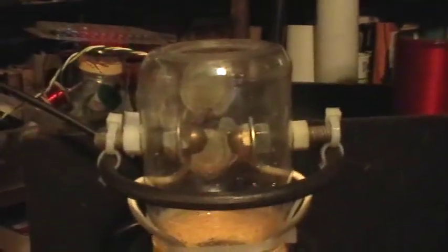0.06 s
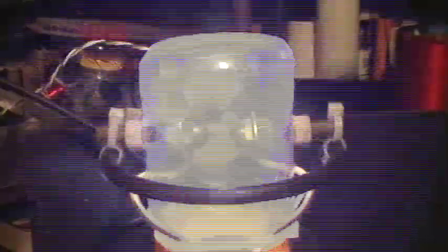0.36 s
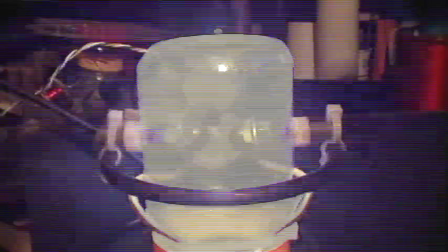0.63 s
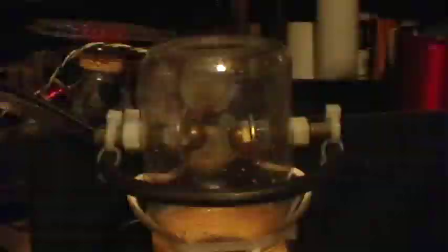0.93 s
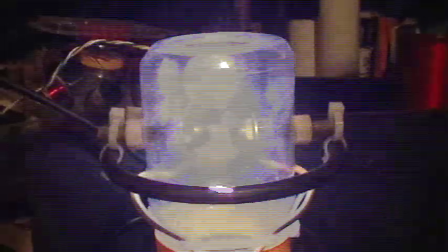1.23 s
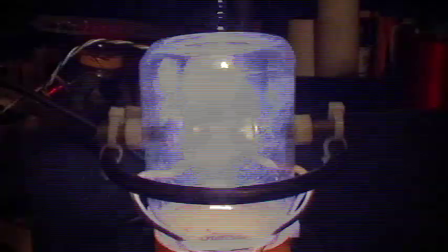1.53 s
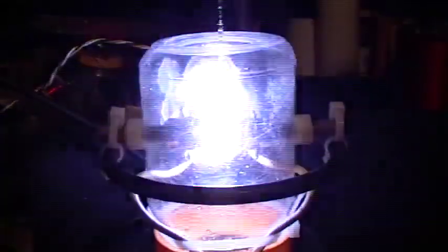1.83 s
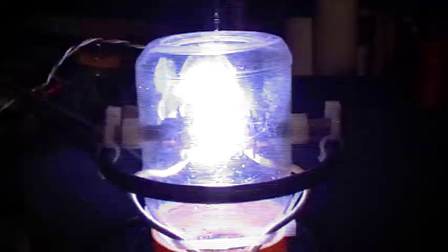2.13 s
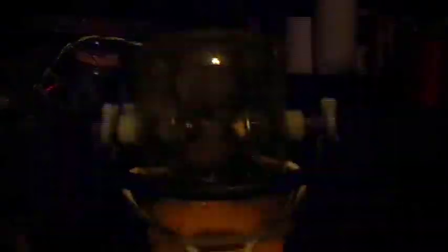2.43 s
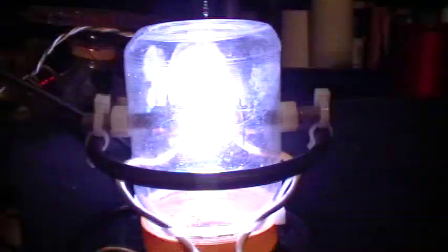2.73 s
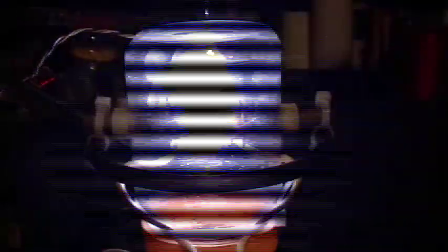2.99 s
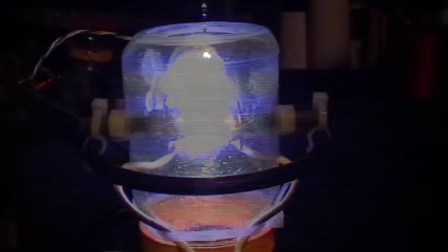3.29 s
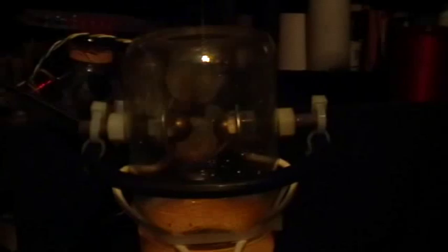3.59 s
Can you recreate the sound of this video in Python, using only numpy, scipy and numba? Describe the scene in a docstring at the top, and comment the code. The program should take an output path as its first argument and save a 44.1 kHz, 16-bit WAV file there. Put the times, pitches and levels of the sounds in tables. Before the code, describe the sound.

A high-voltage spark gap fires sharp, separate snaps that quicken into an irregular crackle, ringing briefly in a glass jar in a small room. Each snap thumps the close microphone. One faint tick comes after the last spark.

```python
"""Sparks in a glass jar

A high-voltage spark gap fires in an upturned jar in a small workshop: single snaps, then a fast,
uneven crackle. Each spark is a sharp pressure pulse that rings the air in the jar and the glass,
then dies away in the room. Soft pops, a few knocks and a last faint tick are heard too. The snaps
overload the close microphone, which adds a low thump to each, and the recorder turns itself down."""
import sys
import numpy as np
from scipy import signal
from scipy.fft import rfft, irfft
from scipy.io import wavfile
from scipy.ndimage import uniform_filter1d
from numba import njit

SR = 44100
rng = np.random.default_rng(int(sys.argv[2]) if len(sys.argv) > 2 else 0)


def persist_wave(psi):
    """Save psi, clipped to +-1, as 16-bit WAV."""
    counts = np.round(np.clip(psi, -1, 1) * 32767).astype(np.int16)
    wavfile.write(sys.argv[1], SR, np.atleast_2d(counts).T)


N = 165375
TAPS = 8192  # samples in one short sound
HZ = np.fft.rfftfreq(TAPS, 1 / SR)  # the frequencies in that sound
AGE = np.arange(TAPS) / SR  # seconds since it began
HOLLOW_T60_S = 0.021  # for knocks and pops; a t60 is the time to fade by 60 dB

# The sparks that jump the gap. Each row: start in seconds, relative strength in dB.
SPARKS = [(0.145, -6), (0.1488, 0.5), (0.1511, -1.5), (0.225, 4), (0.3078, 4), (0.3674, 3.1), (0.4283, 3.5),
          (0.4692, 3.5), (0.5376, 3.6), (0.5806, 3.3), (0.6457, 7.5), (0.6521, -2), (0.685, 1.6),
          (0.7549, 2.5), (0.7964, 0.5), (0.7998, -3), (0.8538, 3), (0.8625, -1.5), (0.8972, 1), (0.9629, 2),
          (1.0045, 0), (1.0486, 1.5), (1.0837, -0.5), (1.1399, 1.5), (1.166, 0.5), (1.2, -1.5),
          (1.2373, 0.2), (1.272, 1.5), (1.3075, 0), (1.3337, 1), (1.3387, -6.5), (1.3585, -0.8),
          (1.3823, -1), (1.4054, -1.5), (1.4219, -0.5), (1.449, 0.5), (1.486, 0.2), (1.5199, 0.5),
          (1.5396, 0.5), (1.5467, -1.5), (1.5643, -1), (1.586, 0.2), (1.6077, 2.3), (1.618, -1),
          (1.6353, -1), (1.6647, 0.5), (1.6767, 0.5), (1.6963, -0.5), (1.7139, 0), (1.723, -2),
          (1.7358, 1.5), (1.7565, -0.5), (1.7709, 1), (1.7838, 1), (1.7985, -1), (1.8165, -1), (1.824, 1),
          (1.836, 0.3), (1.849, -1.5), (1.866, 0), (1.8727, 0), (1.8818, -4), (1.897, 0), (1.909, 0.5),
          (1.9253, -1), (1.9491, 0), (1.9592, -1.5), (1.9697, -2), (1.992, 1), (2.008, -2.5),
          (2.0386, -0.2), (2.0628, -0.5), (2.0682, -2), (2.0935, 0.5), (2.1124, 3.5), (2.132, -1),
          (2.138, 2), (2.15, -3), (2.1608, -0.5), (2.201, 0), (2.2194, 0), (2.2364, -1.5), (2.2536, 1),
          (2.2622, -3.5), (2.2823, -0.5), (2.3266, 1.7), (2.3494, -1.3), (2.4116, 1.5), (2.4627, 0.5),
          (2.5283, 1), (2.5586, 1.5), (2.5764, -1.3), (2.6518, 4), (2.69, 0), (2.707, 0.5), (2.729, 0),
          (2.7529, 1.5), (2.7763, -1), (2.796, -0.5), (2.813, 0.5), (2.8265, 0), (2.8395, 1),
          (2.8675, -1.5), (2.8745, -1.5), (2.89, 0.5), (2.898, -2), (2.921, -0.5), (2.9713, 2.5),
          (2.9885, -0.5), (3.0215, 0.5), (3.0287, -1), (3.0394, 0.5), (3.0459, -1.5), (3.071, -0.5),
          (3.0895, 0.8), (3.099, -1.5), (3.119, -1), (3.1351, 0), (3.1624, -0.2), (3.1789, 2),
          (3.195, -1.5), (3.2213, 3.5), (3.23, -5.5), (3.2683, 0.5), (3.2864, -1.7), (3.3162, 0),
          (3.353, 0), (3.3789, 0.6), (3.4124, 1), (3.4384, -0.5), (3.46, 0.4)]


def amp(db):
    """Turns decibels into a number to multiply by."""
    return 10 ** (np.asarray(db) / 20)


def curve(points, hz):
    """Joins a table's frequency and dB points into a curve, on a scale of octaves."""
    point_hz, db = np.transpose(points)
    return np.interp(np.log(hz + 1), np.log(point_hz + 1), db)


def add(mix, start_s, sound):
    """Mixes a sound in at its start time."""
    part = mix[..., round(start_s * SR):][..., :sound.shape[-1]]
    part += sound[..., :part.shape[-1]]


def causal(db):
    """Makes a filter with these levels that rings only after a sound arrives, never before."""
    log_gain = np.log(amp(np.concatenate([db, db[..., -2:0:-1]], -1)))
    return np.exp(np.conj(signal.hilbert(log_gain)))[..., :len(HZ)]


def coloured(x, points):
    """Gives each row of sound the tone that a table of frequencies and levels describes."""
    taps = irfft(causal(curve(points, HZ)))[:TAPS // 4]
    return signal.oaconvolve(x, taps[None], axes=1)[:, :x.shape[1]]


def ring(tones):
    """Adds up fading pure tones, each with a pitch in Hz, a level in dB and a t60 in seconds."""
    return sum(amp(db - 60 * AGE / t60) * np.sin(2 * np.pi * hz * AGE) for hz, db, t60 in tones)


def workshop():
    """Dull room noise that slowly sinks and dips briefly near the end."""
    # The tone of the noise. Each row: frequency in Hz, relative level in dB.
    tone = [(30, -14), (100, -14.5), (250, 1), (500, -11.5), (800, -6.5), (1600, -19), (2300, -13.5),
            (4000, -23.5), (16000, -43)]
    # Its loudness over time. Each row: time in seconds, level in dB.
    loudness = [(0, -46), (.13, -40), (.3, -46.5), (3.5, -53.5), (3.628, -61), (3.682, -53), (3.75, -49.5)]
    hz = np.fft.rfftfreq(N, 1 / SR)
    # Both ears share "mid"; "side" is what sets left and right apart.
    mid, side = irfft(rfft(rng.standard_normal((2, N))) * amp(curve(tone, hz)), N)
    noise = np.array([mid + 0.18 * side, mid - 0.18 * side]) / mid.std()
    return noise * amp(np.interp(np.arange(N) / SR, *np.transpose(loudness)))


def metal_tick():
    """One faint metallic tick after the last spark: a puff of noise and a thin ring."""
    # The tick's ring. Each row: pitch in Hz, level in dB, t60 in seconds.
    tones = [(1464, -49, 0.78), (4250, -43, 0.045)]
    noise = uniform_filter1d(rng.standard_normal(TAPS), size=3)
    fade = amp(-39.5 - 60 * AGE / 0.071)
    out = np.zeros(N)
    add(out, start_s=3.655, sound=ring(tones) + fade * noise)
    return out


def knocks():
    """Short hollow knocks come with a few of the sparks, a little to the right."""
    # Each row: start in seconds, level in dB, pitch in Hz, overtone level in dB relative to the knock.
    hits = [(0.1475, 1.5, 393, -4), (0.2252, -1.5, 474, 1), (0.3083, -9, 370, -11), (0.3689, -4, 430, 0),
            (0.582, -8, 201, -11), (0.687, 1, 315, -18), (1.142, 0, 262, -10), (1.274, -10.5, 490, 2),
            (1.336, 2, 225, -16), (1.546, 2.5, 165, -12), (1.617, -6.5, 434, -8), (2.921, -8, 337, -11),
            (3.099, -4, 407, -0.5)]
    out = np.zeros(N)
    for start_s, db, hz, overtone_db in hits:
        add(out, start_s, ring([(hz, db, HOLLOW_T60_S), (hz * 1.7, db + overtone_db, HOLLOW_T60_S)]))
    bass_cut = signal.butter(2, 196, "high", fs=SR)
    left_right_db = [-5.5, -0.5]
    return signal.lfilter(*bass_cut, out) * amp(left_right_db)[:, None]


def pops():
    """Every spark gives a soft hollow pop: two tones, each at a random pitch and left-right position."""
    low_hz, high_hz, pop_db = 140, 959, -14.5
    out = np.zeros((2, N))
    for (start_s, db), pair in zip(SPARKS, rng.random((len(SPARKS), 2, 2))):
        for height, left in pair:
            hz = low_hz * (high_hz / low_hz) ** height
            tone = ring([(hz, pop_db + db, HOLLOW_T60_S)])
            add(out, start_s, np.outer([left, 1 - left], tone))
    bass_cut = signal.butter(2, low_hz, "high", fs=SR)
    return signal.lfilter(*bass_cut, out)


def bump(hz, width_hz, db):
    """A resonance boosts the frequencies near its own; a negative dB value makes a dip."""
    return db / (1 + (2 * (HZ - hz) / width_hz) ** 2)


def jar_filter(time_s):
    """The air in the jar favours some pitches, and the microphone adds a treble peak of its own."""
    # Peaks and dips of that air. Each row: pitch in Hz, width in Hz, boost in dB, change in dB a second.
    resonances = [(796, 160, 2.5, 1), (1320, 250, 5, -1.5), (2150, 1100, -1, 3), (2576, 140, -7.5, 1.5),
                  (3590, 300, 6, 0), (3890, 190, -4.5, 0), (5656, 194, 8, 1), (5794, 79, -6.5, -3.5),
                  (5974, 180, 6.5, 1), (7945, 190, 3, 2.2), (9080, 230, -0.5, 3), (10490, 245, 6, 0.5),
                  (11174, 100, 9, 0.5), (14630, 270, -2, -3.5), (14940, 280, 9, -1.5)]
    # The sparks warm the air, so these pitches rise together, then settle.
    # Each row: time in seconds, shift as a fraction of the pitch.
    warming = [(0.6, -0.018), (1.4, 0.0038), (3.5, 0.00081)]
    stretch = 1 + np.interp(time_s, *np.transpose(warming))
    air_db = sum(bump(hz * stretch, width, db + change * time_s) for hz, width, db, change in resonances)
    microphone_db = bump(hz=11450, width_hz=390, db=8.5)
    response = causal(air_db + microphone_db)
    return response / np.sqrt(np.mean(abs(response) ** 2))


def echoes(t60_s, count):
    """The spectra of dense, fading runs of random echoes, each evened out from bass to treble."""
    spectra = rfft(rng.standard_normal((count, TAPS)) * amp(-60 * AGE / t60_s))
    power = uniform_filter1d(abs(spectra) ** 2, max(3, round(6 / t60_s / HZ[1])), axis=1)
    return spectra * causal(-10 * np.log10(power + 1e-12))


def snap_stage(tone, gain_db, t60_s, side_db, wander):
    """One stage of every snap. Wander (0 to 1) sets how much its echoes change with the spark's path."""
    # How unlike left and right are. Each row: frequency in Hz, relative side level in dB.
    stereo_width = [(100, -3.5), (800, -12.5), (1500, -7.5), (2500, -25), (5000, -35.5), (8500, -31.5),
                    (10500, -14.5), (14500, -13.5)]
    body = causal(curve(tone, HZ))
    body *= amp(gain_db) / np.sqrt(np.mean(abs(body) ** 2))
    fade_out = np.minimum(2 - 2 * AGE / AGE[-1], 1) ** 2
    patterns = irfft(echoes(t60_s, count=25) * body) * fade_out
    # All sparks share the first echo pattern; each adds its own blend of the rest.
    common, varying = patterns[0], patterns[1:]
    blend = rng.standard_normal((len(SPARKS), 2, len(varying)))
    blend /= np.linalg.norm(blend, axis=2, keepdims=True)
    mid = np.sqrt(1 - wander ** 2) * common + wander * blend[:, 0] @ varying
    side = amp(side_db) * blend[:, 1] @ coloured(varying, stereo_width)
    return np.stack([mid + side, mid - side], 1)


def spark_gap():
    """Each spark's pressure pulse cracks, echoes in the jar, rings the glass and fades in the room."""
    # The tones of the first crack, the jar's echoes and the room's echoes.
    # Each row: frequency in Hz, relative level in dB.
    crack_tone = [(100, -17.5), (500, -11.5), (1300, -12), (2750, -10.5), (5000, -6.5), (7000, -9.5),
                  (9000, -8), (11400, -1.5), (13500, 1), (16000, -2.5)]
    jar_tone = [(100, -25.5), (500, -11.5), (1300, -9), (2200, -12.5), (3500, -7), (5000, -1), (7000, -8),
                (9000, 1.5), (13500, 1.5), (16000, -4)]
    room_tone = [(200, -29.5), (600, -19.5), (1200, -11), (1550, -25.5), (1900, -15.5), (2600, -7.5),
                 (3200, 2.5), (3650, -4), (3950, -21.5), (4300, -8), (4600, -3), (7000, 5.5), (9000, 1.5),
                 (13500, 4), (16000, -15)]
    # The ringing glass. Each row: pitch in Hz, relative level in dB, t60 in seconds.
    glass_tones = [(797, -61.5, 0.22), (2930, -64, 0.27), (3220, -64, 0.16), (3490, -56.5, 0.12),
                   (5510, -57.5, 0.15), (5674, -61, 0.11), (7100, -58.5, 0.16), (9000, -60.5, 0.12),
                   (10240, -54.5, 0.12)]
    crack = snap_stage(crack_tone, gain_db=2, t60_s=0.004, side_db=-5, wander=0.51)
    jar = snap_stage(jar_tone, gain_db=-2, t60_s=0.043, side_db=1.5, wander=0.87)
    room = snap_stage(room_tone, gain_db=-11, t60_s=0.13, side_db=5.5, wander=0.42)
    push_s, spark_gain_db = 0.0001, 23.5
    pulse = amp(-12.5) * (1 - AGE / push_s) * np.exp(-AGE / push_s)  # a push, then a weaker pull
    glass = ring(glass_tones)
    out = np.zeros((2, N))
    for (start_s, db), snap in zip(SPARKS, crack + jar + room):
        snap_in_jar = irfft(rfft(snap + pulse) * jar_filter(start_s))
        add(out, start_s, amp(spark_gain_db + db) * (snap_in_jar + glass))
    return out


def scene():
    """The spark gap in its workshop."""
    return spark_gap() + pops() + knocks() + workshop() + metal_tick()


def overloaded_microphone(x):
    """The microphone squashes loud waves lopsidedly, so each snap leaves a low thump."""
    # The tone of the thump. Each row: frequency in Hz, relative level in dB.
    thump_tone = [(20, -36), (60, -31.5), (110, -12), (170, -7.5), (300, -8), (400, -9.5), (490, -21.5),
                  (640, -1), (850, -14), (1150, -17.5), (2200, -14.5), (5000, -45)]
    overload_level, fade_db_per_s = 2.33, 1.07
    squashed = np.tanh(x / overload_level)
    lean = uniform_filter1d(rng.standard_normal(N), size=40)  # tips each thump left or right
    lean *= 0.37 / lean.std()
    strength = amp(-0.46 - fade_db_per_s * np.arange(N) / SR)  # later thumps are weaker
    push = squashed ** 2 * strength * np.array([1 + lean, 1 - lean])  # squaring makes it lopsided
    return overload_level * (squashed + coloured(push, thump_tone))


@njit
def gain_control(level_db, limit_db, start_db, drop_db_per_s, recover_db_per_s):
    """The recorder's volume in dB: it drops fast while the sound is too loud, then creeps back."""
    out = np.empty(len(level_db))
    gain = start_db
    for i in range(len(out)):
        if level_db[i] + gain > limit_db:
            gain -= drop_db_per_s / SR
        else:
            gain = min(gain + recover_db_per_s / SR, start_db)
        out[i] = gain
    return out


def record(dry):
    """The microphone overloads; the recorder turns down, clips the peaks and cuts the highest treble."""
    x = overloaded_microphone(dry)
    power = uniform_filter1d((x ** 2).mean(0), size=200)
    level_db = 10 * np.log10(abs(power) + 1e-12)
    gain_db = gain_control(level_db, limit_db=-8.5, start_db=-3.5,
                           drop_db_per_s=145.5, recover_db_per_s=0.22)
    clipped = np.clip(x * amp(gain_db), -1, 1)
    treble_cut = signal.firwin(255, cutoff=16000, window=("kaiser", 8), fs=SR)
    return signal.oaconvolve(clipped, treble_cut[None], "same")


dry = scene()
out = record(dry)
persist_wave(out)
```